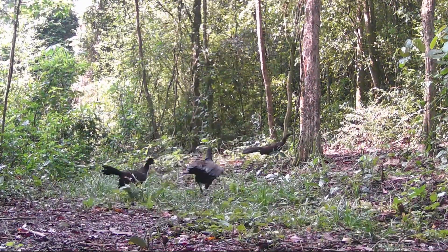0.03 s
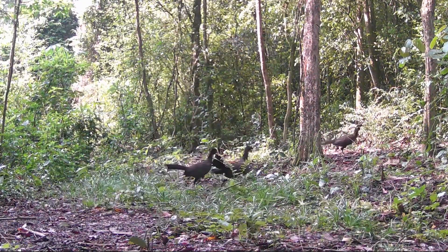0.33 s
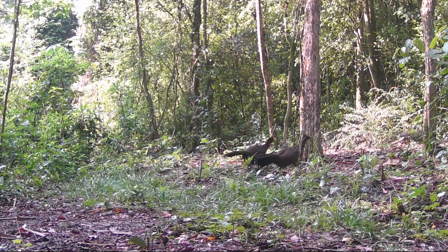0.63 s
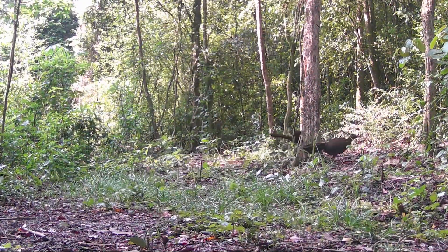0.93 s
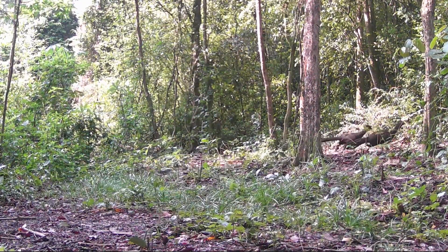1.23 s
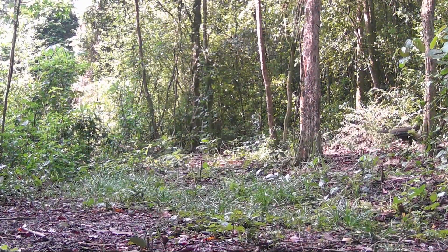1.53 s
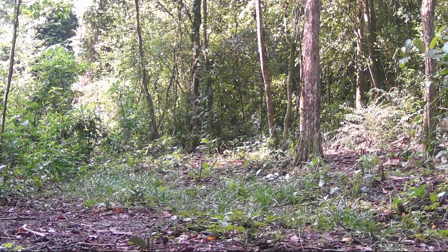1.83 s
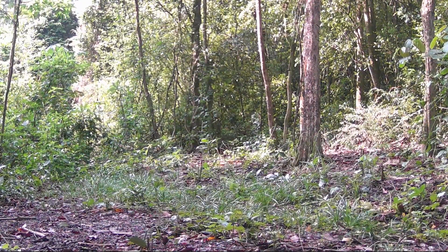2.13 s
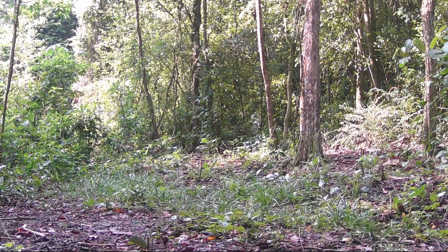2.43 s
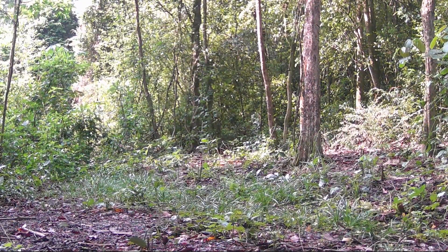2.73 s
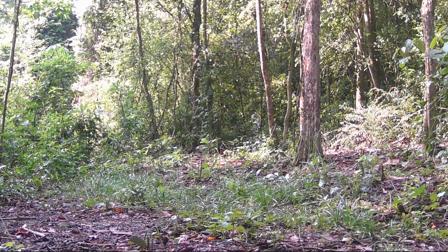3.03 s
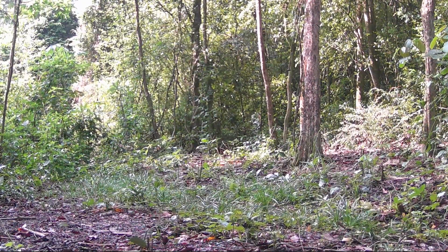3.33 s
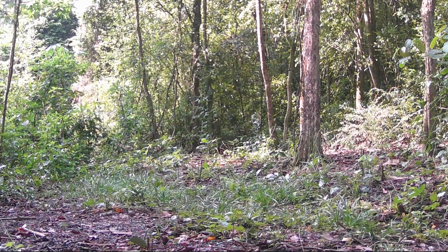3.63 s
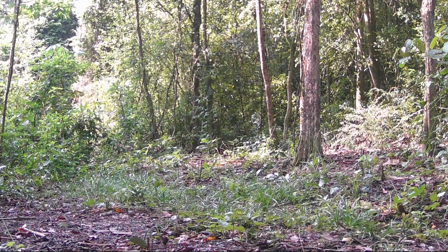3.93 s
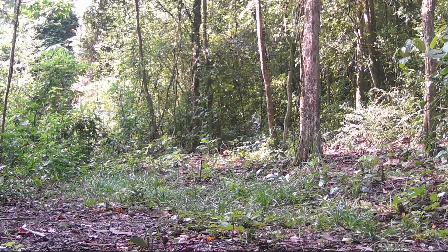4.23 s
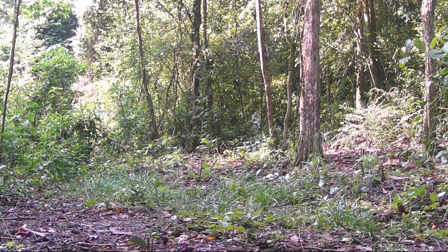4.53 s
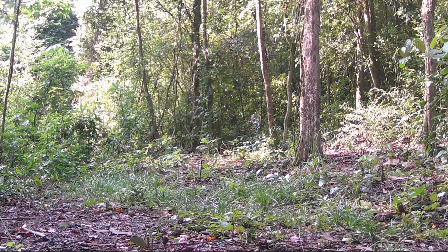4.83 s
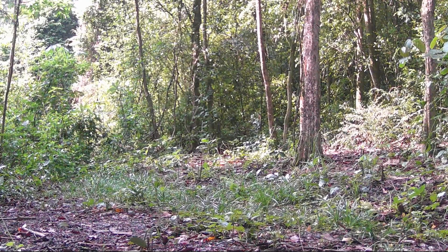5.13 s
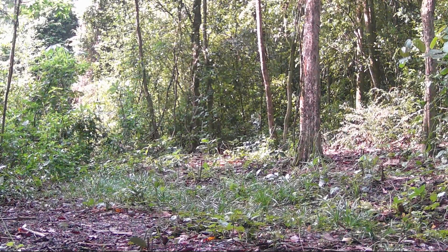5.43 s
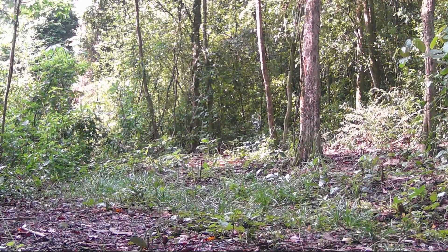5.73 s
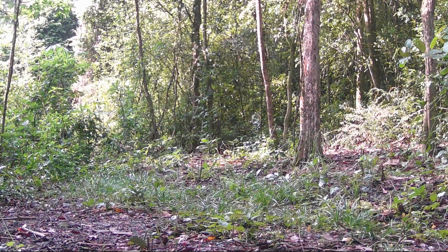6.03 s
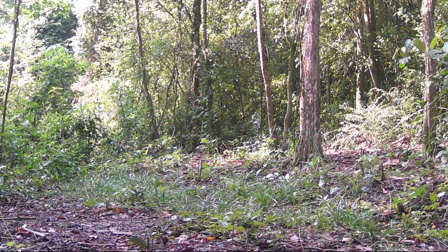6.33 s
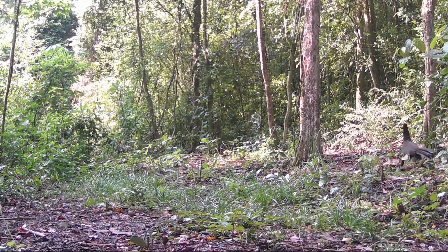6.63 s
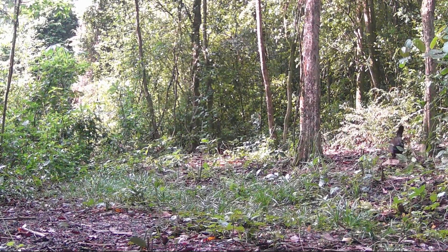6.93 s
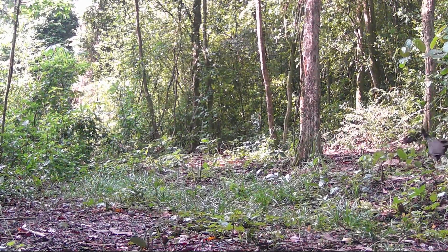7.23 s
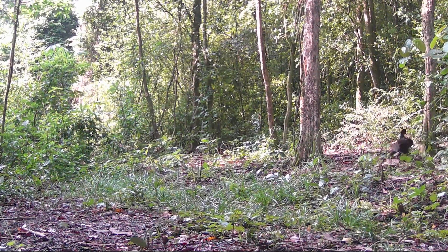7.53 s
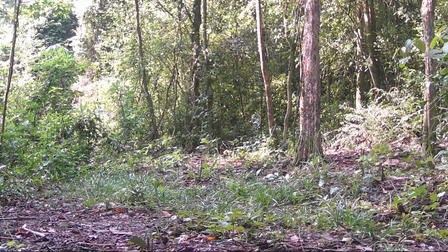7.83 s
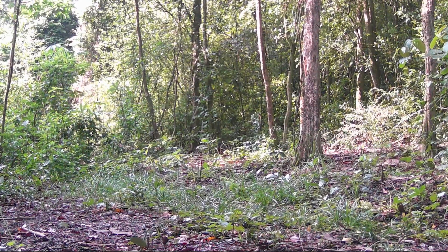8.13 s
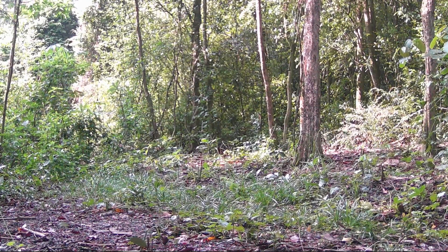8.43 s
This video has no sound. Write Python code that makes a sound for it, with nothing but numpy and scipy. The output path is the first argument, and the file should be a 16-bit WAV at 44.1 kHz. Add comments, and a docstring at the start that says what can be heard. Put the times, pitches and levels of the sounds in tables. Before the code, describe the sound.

A dense, high cicada chorus fills a woodland clearing throughout, over a steady distant rumble. In the first second, wind buffets the microphone with a few low puffs and dies away. The nearest cicada rasps up to a crest and sinks to a drone about every 0.7 seconds from 1 to 5.5 seconds, then twice more around 7.3 and 8 seconds. Others buzz and throb further back. Close by, large ground birds give short arched yelps that break into croaks, scattered all the way through and clearest near 2.6, 5.5, 6.2 and 6.8 seconds. Their feet crunch lightly in dry leaves on and off until about 3.7 seconds, and again from 6.5 to 7.8 seconds. A faint, far bird whistles a thin song of rising and falling notes, starting near 0.6, 2.9 and 5.8 seconds.

```python
"""A woodland clearing full of cicadas. Low thumps throb at first, over a far, steady rumble. Close by, large
ground birds run through the leaf litter, clucking in arched yelps that break into a croak. The nearest cicada
buckles its ribbed drums, rasping up to a crest and sinking to a drone again and again. Further back among the
trees other cicadas buzz and throb, and a far bird whistles."""
import sys
import numpy as np
from scipy import signal
from scipy.fft import rfft, irfft, next_fast_len
from scipy.io import wavfile
from scipy.ndimage import uniform_filter1d, map_coordinates

SR = 44100
rng = np.random.default_rng(int(sys.argv[2]) if len(sys.argv) > 2 else 0)


def wav_record(signal):
    """Record a signal, one row per channel, as 16-bit PCM in the file named by sys.argv[1]."""
    frames = np.transpose(np.atleast_2d(signal))
    bounded = np.clip(frames, -1, 1)
    # unit amplitude maps onto the largest positive 16-bit level
    quanta = np.round(bounded * 32767).astype(np.int16)
    wavfile.write(sys.argv[1], SR, quanta)


N = 377937
T = np.arange(N) / SR

# Levels in the tables are relative; each source sets its own gain.
# far rumble: (frequency [Hz], level [dB])
RUMBLE_SPECTRUM = [(20, -6), (35, -2), (75, 0.5), (110, -2), (160, -12.5), (250, -15), (400, -27),
                   (1000, -43)]
# lighter rumble that dies away early: (frequency [Hz], level [dB])
EARLY_SPECTRUM = [(60, -25), (130, -3), (200, -0.5), (290, -5), (420, -22), (900, -62)]
# leaves and far air: (frequency [Hz], level [dB])
HUSH_SPECTRUM = [(100, -4.5), (500, -1.5), (800, -4), (1300, -8.5), (2500, -11), (4000, -5), (8000, -21.5)]
# low thumping noise at the start: (frequency [Hz], level [dB])
THUMP_SPECTRUM = [(12, -30.5), (20, 6), (43, 1.5), (67, 4), (325, -27), (365, -32.5), (600, -54),
                  (780, -82), (1320, -120)]
# strongest peaks of the low swell: (time [s], level [dB])
SWELL_PEAKS = [(.31, -18.5), (.415, -18), (.59, -18), (0.711, -24.5)]
# sharp low thumps: (time [s], frequency [Hz], level [dB])
THUMPS = [(.283, 191, -23.5), (0.444, 200, -28), (0.562, 220, -20.5), (.594, 126, -19)]
# far insect chorus: (time [s], level [dB])
CHORUS_LEVEL = [(0, -52), (3.77, -49.5), (8.57, -52)]
# its colour: (frequency [Hz], level [dB])
CHORUS_SPECTRUM = [(2000, -48.5), (3000, -23), (3400, -15.5), (3900, -0.5), (4300, -3.5), (5200, -3),
                   (6500, -3), (7500, -1.5), (7950, -5.5), (8300, -28.5)]
# thin steady insects: (start [s], end [s], centre [Hz], half-width [Hz], level [dB])
INSECT_TRILLS = [(1.5, 5.2, 6547, 17, -53.5), (0, 5.8, 4135, 21, -55.5)]
# far rasps swelling out of the chorus: (time [s], level [dB])
RASP_SWELLS = [(3.55, -48.5), (5.02, -50.5), (5.78, -50.5), (6.3, -53), (6.58, -53.5)]
# cicadas holding a note: (start [s], end [s], click rate [Hz], ring [Hz], width [Hz], level [dB])
HELD_NOTES = [(-.1, .8, 337.5, 4800, 2200, -51), (1.2, 5.3, 331.6, 4400, 900, -52),
              (7.37, 7.82, 329.4, 4000, 300, -47), (8.1, 8.6, 329.6, 4000, 300, -46.5)]
# effort of the throbbing cicada: (time [s], level [dB])
THROB_LEVEL = [(.15, -52.5), (1.65, -49), (2.25, -54.5), (2.95, -51), (3.35, -59.5), (5.1, -61), (5.4, -49),
               (5.75, -49), (6.25, -55.5), (6.5, -44.5), (6.9, -44)]
# heavier footfalls in dry leaves: (time [s], level [dB], thud offset [dB])
FOOTFALLS = [(0.133, -33, -14), (.2353, -36.5, -3), (1.6632, -35, -20), (2.065, -40, -13),
             (3.042, -36.5, -6), (3.1021, -41, -19), (3.687, -34, 4), (6.5115, -38, -15),
             (7.078, -32.5, -5), (7.135, -37.5, 0.5), (7.257, -36.5, -2), (7.67, -36.5, -2.5),
             (7.782, -37.5, -5)]
# ground birds: (time of top [s], arch length [s], top pitch [Hz], level [dB], croak offset [dB])
YELPS = [(.215, 0.053, 738, -52.5, -24), (.365, 0.073, 1200, -60.5, 6), (.65, 0.12, 670, -57, -14),
         (1.085, .063, 1193, -53, 0), (1.195, 0.072, 693, -60, -20), (1.68, 0.069, 760, -61.5, -19),
         (1.838, .057, 1170, -54, 6), (2.04, .1, 660, -62, -15), (2.564, .066, 1100, -49, -6.5),
         (2.65, .051, 732, -57, 6), (3.245, 0.093, 718, -56, -4), (3.298, .067, 1127, -52.5, 1),
         (3.985, 0.095, 863, -54.5, -10), (4.535, 0.067, 839, -57, -14), (4.82, 0.067, 1138, -56, -5),
         (5.455, .1, 1095, -50.5, -1), (6.242, 0.054, 1200, -47.5, -0.5), (6.57, .073, 684, -61, 0),
         (6.845, 0.053, 1190, -50, 1), (7.215, 0.056, 685, -57.5, -1), (7.49, 0.11, 1097, -54.5, 1),
         (8.275, 0.051, 1227, -63, 6)]
# throat resonances in a croak: (frequency [Hz], level [dB], t60 [s])
THROAT_MODES = [(551, 6, 0.02), (1040, 1.5, 0.0022), (2000, -9, 0.014)]
# far bird's notes, alternately rising and falling, then one more low rising note:
# (time in song [s], from [Hz], toward [Hz], level [dB])
SONG_NOTES = [(0, 1880, 2226, -62.5), (.275, 2700, 2133, -62), (.755, 1793, 2066, -62.5),
              (1.08, 2407, 2126, -61.5), (1.575, 1672, 1810, -64), (1.735, 2260, 2110, -63.5),
              (1.95, 1805, 2040, -62.5), (2.37, 1654, 1850, -67)]
# each time it sings: (start [s], no new note after [s], level [dB])
SONG_REPEATS = [(.62, 1.85, 0.5), (2.91, 2.6, 1), (5.82, 2.15, -0.5)]
# nearest cicada's phrases: (time of crest [s], ring at crest [Hz], resting click rate [Hz])
CRESTS = [(1.16, 7270, 390), (1.87, 7060, 335.8), (2.6, 7140, 335.4), (3.29, 7100, 340), (3.98, 7060, 360),
          (4.67, 7100, 331.4), (5.38, 6980, 377), (7.26, 6830, 329.4), (8.02, 6660, 329.6)]
# one phrase: (time from crest [s], tension [1 at crest], rasp level [dB], drone level [dB])
PHRASE_SHAPE = [(-.45, .2, -30, -50), (-.3, .4, -9, -40), (-.17, .68, -4, -25), (-.06, .8, -3, -10),
                (0, 1, -2, 6), (.045, .62, -9, 8), (.09, .25, -18, 4), (.22, 0, -30, 0),
                (.42, -.05, -35, -2), (.58, .1, -50, -14)]
# decay among the trees: (frequency [Hz], t60 [s])
TREE_DECAY = [(200, 0.28), (1200, 0.36), (3000, 0.62), (8000, 0.12)]


def amp(db):
    return 10 ** (np.asarray(db) / 20)


def unit(x):
    return x / np.sqrt(np.mean(x ** 2) + 1e-20)


def along(points, hz):
    """(Hz, value) points read on a log axis."""
    f, v = np.transpose(points)
    return np.interp(np.log(hz + 1), np.log(f + 1), v)


def curves(rows, t=T):
    """Each column after the time, read at the times t."""
    s, *cols = np.transpose(rows)
    return [np.interp(t, s, c) for c in cols]


def wobble(rate):
    """A smooth random curve, rate knots a second."""
    knots = rng.standard_normal(int(N * rate / SR) + 4)
    return np.interp(T, T[::64], map_coordinates(knots, [T[::64] * rate]))


def filtered(x, gain):
    """x times a gain that depends on frequency."""
    m = next_fast_len(len(x) + 8192)
    return irfft(rfft(x, m) * gain(np.fft.rfftfreq(m, 1 / SR)), m)[:len(x)]


def coloured(x, spectrum):
    return filtered(x, lambda hz: amp(along(spectrum, hz)))


def noise(spectrum):
    """Noise of rms 1 with a (Hz, dB) spectrum."""
    return unit(coloured(rng.standard_normal(N), spectrum))


def gate(start, end, fade=0.045):
    return np.clip(np.minimum(T - start, end - T) / fade + .5, 0, 1)


def bump(s, width_s):
    return np.exp(-.5 * ((T - s) / width_s) ** 2)


def add(track, s, x):
    """Mix x into the track from time s on."""
    i = max(0, round(s * SR))
    track[i:i + len(x)] += x[:max(0, N - i)]


def clicks(times, hz, t60, gain, attack=1e-5, size=200):
    """Damped sines struck at exact times, all of like energy before their gain."""
    index = np.ceil(times * SR).astype(int)[:, None] + np.arange(size)
    t = index / SR - times[:, None]
    ring = np.sin(2 * np.pi * np.reshape(hz, (-1, 1)) * t) * amp(-60 * t / t60)
    ring *= 1 - np.exp(-t / attack)
    ring *= np.reshape(gain, (-1, 1)) / np.linalg.norm(ring, axis=1, keepdims=True)
    inside = (index >= 0) & (index < N)
    return np.bincount(index[inside], ring[inside], N)


def far_air(early_until_s=2.63, fade_db_per_s=11):
    """A far rumble that swells once, a lighter one that dies away, and a hush of leaves."""
    swell_db = 3.5 * bump(3.83, width_s=.2)
    rumble = noise(RUMBLE_SPECTRUM) * amp(-45 + swell_db + 0.62 * wobble(6))
    early = noise(EARLY_SPECTRUM) * amp(-56 - fade_db_per_s * np.maximum(T - early_until_s, 0))
    return rumble + early + amp(-55.5) * noise(HUSH_SPECTRUM)


def low_thumps(peak_s=.45, rise_db_per_s=21, fall_db_per_s=23, thump_cycles=2.1):
    """Low noise swells and dies away at the start, with a few stronger peaks and sharp thumps."""
    swell = amp(-27.5 - np.maximum(rise_db_per_s * (peak_s - T), fall_db_per_s * (T - peak_s)))
    eddies = sum(amp(db) * bump(s, width_s=0.031) for s, db in SWELL_PEAKS)
    out = noise(THUMP_SPECTRUM) * amp(-2) * np.hypot(swell, eddies)
    t = np.arange(SR // 20) / SR
    for s, hz, db in THUMPS:
        window = np.sin(np.pi * np.minimum(t * hz / thump_cycles, 1)) ** 2
        add(out, s, amp(db) * window * np.sin(2 * np.pi * hz * t))
    return out


def buzz(t, rate, ring_hz, width_hz, uneven_db, waver_db):
    """Overtones of a cicada's clicks under one body resonance; unequal drums add lines halfway between."""
    knots = np.arange(t[0], t[-1] + .2, .1)
    out = np.zeros(len(t))
    for k in np.arange(19, 49) / 2:
        gain = amp(2 * (k % 1) * uneven_db) / np.hypot(1, 2 * (k * rate - ring_hz) / width_hz)
        waver = np.interp(t, knots, amp(waver_db * rng.standard_normal(len(knots))))
        phase = 2 * np.pi * (k * rate * t % 1) + rng.uniform(0, np.pi)
        out += gain * waver * np.sin(phase.astype(np.float32))
    return unit(out)


def far_chorus():
    """Far cicadas buzz at their own rates; countless others merge to a hiss with trills and rasps."""
    voices = sum(buzz(T, rng.uniform(322, 340), rng.uniform(4000, 6000), 5000, uneven_db=-6, waver_db=3)
                 for _ in range(3))
    out = unit(coloured(voices, CHORUS_SPECTRUM)) + noise(CHORUS_SPECTRUM)
    out *= amp(curves(CHORUS_LEVEL)[0] + 1 + 0.56 * wobble(8))
    for start, end, centre, width, db in INSECT_TRILLS:
        trill = filtered(rng.standard_normal(N), lambda hz: 1 / (1 + ((hz - centre) / width) ** 4))
        out += unit(trill) * gate(start, end) * amp(db)
    swells = sum(amp(db) * bump(s, width_s=0.092) for s, db in RASP_SWELLS)
    return out + swells * noise([(4500, -24.5), (5800, -12), (6900, 0.5), (7700, -6), (8300, -30)])


def other_cicadas(throb_start_s=.15, gap_s=.16, slowing_s=.00093, throb_click_hz=329.5):
    """Back in the trees some hold an even buzz; one throbs in bursts that come ever more slowly."""
    out = np.zeros(N)
    for start, end, rate, hz, width_hz, db in HELD_NOTES:
        level = gate(start, end, fade=0.13)
        on = level > 0
        out[on] += amp(db) * level[on] * buzz(T[on], rate, hz, width_hz, uneven_db=-3, waver_db=2.5)
    k = np.arange(39)
    bursts = throb_start_s + k * (gap_s + slowing_s * (k - 1) / 2)
    for s, db in zip(bursts, curves(THROB_LEVEL, bursts)[0]):
        effort = np.clip((db + 56) / 10, 0, 1)  # a harder burst lasts longer and rings higher
        half_s = 0.05 + .045 * effort
        t = np.arange(s - half_s, s + half_s, 1 / SR)
        burst = buzz(t, throb_click_hz, 3680 + 175 * effort, width_hz=270, uneven_db=-30, waver_db=1)
        add(out, s - half_s, amp(db) * signal.windows.tukey(len(t), .7) * burst)
    return coloured(out, [(2400, -27), (3000, -13.5), (3300, -1.5), (8000, -1)])


def footsteps(t60=0.11, attack_s=.0025, scuff_count=5, scuff_until_s=3):
    """Close by, each foot crushes dry leaves and knocks the soil; light scuffs as the birds run off."""
    scuffs = [(scuff_until_s * (k + rng.uniform()) / scuff_count, rng.normal(-42.5, 3), -7)
              for k in range(scuff_count)]
    crush, knock = np.zeros((2, N))
    t = np.arange(SR // 5) / SR
    shape = amp(-60 * t / t60) * (1 - np.exp(-t / attack_s))
    for s, db, thud_db in FOOTFALLS + scuffs:
        add(crush, s, amp(db) * shape)
        add(knock, s, amp(db + thud_db) * shape)
    leaves = noise([(500, -21), (1300, 8), (2500, 10), (4000, -14), (8000, -40.5)])
    leaves *= amp(3.5 * wobble(330))  # crackle
    soil = noise([(100, -12.5), (400, -9.5), (900, -7), (1600, -17), (4000, -52)])
    return amp(-12) * crush * leaves + amp(-10) * knock * soil


def yelp(t, u, top_hz, bright_db, beak_hz=2300, beak_width_hz=550):
    """The voice arches up to its top at u = 0 and turns hoarse on the way down to u = 1."""
    hoarse = np.clip(u, 0, 1)
    arch = np.interp(top_hz, [700, 1150], [2.3, 1.45])  # flat-topped when low, pointed when high
    jitter, shimmer = unit(uniform_filter1d(rng.standard_normal((2, len(t))), size=150, axis=1))
    hz = top_hz * (1 - (.43 + .15 * hoarse) * np.abs(u) ** arch)
    hz *= 1 + (.022 + .055 * hoarse) * jitter
    phase = 2 * np.pi * np.cumsum(hz) / SR
    # overtones flash up as they sweep through the resonance of the beak
    overtones = sum(np.sin(k * phase) * 2 / k / (1 + ((k * hz - beak_hz) / beak_width_hz) ** 2)
                    for k in range(2, 5))
    voice = np.sin(phase) + amp(bright_db + 1) * overtones
    return voice * amp((3 + 2 * hoarse) * shimmer) * signal.windows.tukey(len(t), .35)


def croak(start, bright_db, pulse_hz=175, width_s=0.037):
    """The voice drops into separate, slowing pulses that ring the throat."""
    out = np.zeros(N)
    k = np.arange(7)
    slip, size = rng.standard_normal((2, len(k)))
    delay = (k * (1 + .04 * k) + .15 * slip) / pulse_hz
    push = amp(2 * size) * np.exp(-((delay - .012) / (width_s / 2)) ** 2)
    for order, (mode_hz, mode_db, t60) in enumerate(THROAT_MODES):
        open_db = (bright_db + 5.5 - 350 * delay) * order / 2  # the beak closes during the croak
        hz = mode_hz * (1 + 0.089 * rng.standard_normal(len(k)))
        out += clicks(start + delay, hz, t60, push * amp(mode_db + open_db), attack=0.00041, size=900)
    return out


def clucks(rise_share=.49, opens_hz=1121, opening_span_hz=54.6):
    """Near ground birds yelp, then croak; the beak opens on high calls and brightens them."""
    out = np.zeros(N)
    for s, length, top_hz, db, croak_db in YELPS:
        rise, fall = length * rise_share, length * (1 - rise_share)
        bright_db = -9.5 + 9 * np.clip((top_hz - opens_hz) / opening_span_hz, 0, 1)
        t = np.arange(-1.2 * rise, 1.3 * fall, 1 / SR)
        u = t / np.where(t < 0, rise, fall)
        add(out, s + t[0], amp(db + 5.5) * yelp(t, u, top_hz, bright_db))
        out += amp(db + croak_db + 26) * croak(s + .9 * fall, bright_db)
    return out


def far_whistler(note_s=.19, settle=0.37, waver=.014, flicker_db=3):
    """One far song, repeated: thin notes slide and settle, flickering through the foliage."""
    out = np.zeros(N)
    u = np.arange(int(note_s * SR)) / (note_s * SR)
    window = signal.windows.tukey(len(u), .4)
    for start, lasts, song_db in SONG_REPEATS:
        for s, from_hz, toward_hz, db in SONG_NOTES:
            if s < lasts:
                hz = toward_hz + (from_hz - toward_hz) * np.exp(-u / settle)
                hz *= 1 + waver * wobble(70)[:len(u)]
                add(out, start + s, amp(song_db + db) * window * np.sin(2 * np.pi * np.cumsum(hz) / SR))
    return out * amp(flicker_db * wobble(45))


def tymbals(crest, rate, speedup=.56, uneven=0.1036, drift=0.00249):
    """Click times of two ribbed drums that buckle in turn, and race at full tension."""
    t = np.arange(crest + PHRASE_SHAPE[0][0], crest + PHRASE_SHAPE[-1][0], 1 / SR)
    tension = curves(PHRASE_SHAPE, t - crest)[0]
    race = np.clip(1.25 * tension, 0, 1) ** 4
    turns = np.cumsum(rate * (1 + speedup * race + drift * wobble(8)[:len(t)])) / SR
    k = np.arange(int(turns[-1]))
    return np.interp(k + uneven * (k % 2), turns, t)


def near_cicada(relax_hz=1650, flutter_hz=50, flutter_db=3, scatter_db=4):
    """Tension lifts the ring of the body and adds a fluttering rasp of loose ribs to the even clicks."""
    out = np.zeros(N)
    for crest, top_hz, rate in CRESTS:
        times = tymbals(crest, rate)
        tension, rasp_db, drone_db = curves(PHRASE_SHAPE, times - crest)
        hz = top_hz - relax_hz * (1 - tension)
        size = np.sqrt(SR * np.gradient(times))  # faster clicks are smaller
        out += clicks(times, hz, t60=0.004, gain=amp(drone_db - 51) * size)
        rasp_db += flutter_db * np.sin(2 * np.pi * flutter_hz * times)
        for rib in range(3):
            slip, scatter, detune = rng.standard_normal((3, len(times)))
            rib_hz = hz * (1 + 0.036 * detune)
            gain = amp(rasp_db - 50 + scatter_db * scatter) * size
            out += clicks(times + slip / rate, rib_hz, t60=0.0024, gain=gain, attack=0.00036)
    return coloured(out, [(2500, -54.5), (3400, -8), (4000, 0.5), (7800, 5), (8300, -3.5)])


def trees(x):
    """Trunks and leaves scatter the sound back to the microphone; the high treble dies first."""
    hz, t, bands = signal.stft(rng.standard_normal((SR * 3) // 4), SR, nperseg=256)
    decay = amp(-60 * t / along(TREE_DECAY, hz)[:, None])
    tail = signal.istft(bands * decay, SR, nperseg=256)[1]
    return signal.fftconvolve(x, tail / np.linalg.norm(tail))[:N]


def scene():
    """Ground birds are near the microphone and fairly dry; insects and whistler sit among the trees."""
    ground = clucks() + footsteps()
    cicada, others, whistler = near_cicada(), other_cicadas(), far_whistler()
    direct = ground + amp(-6) * cicada + amp(-1) * others + amp(-6) * whistler
    echo = trees(amp(-11) * ground + amp(-4.5) * cicada + amp(-11.5) * others + amp(-4) * whistler)
    return direct + echo + far_chorus() + far_air() + low_thumps()


def record(dry, top_hz=8140):
    """One microphone, on a camera that keeps nothing above its band limit."""
    return filtered(dry, lambda hz: 1 / np.sqrt(1 + np.minimum(hz / top_hz, 2) ** 400))[None]


dry = scene()
out = record(dry)
wav_record(out)
```